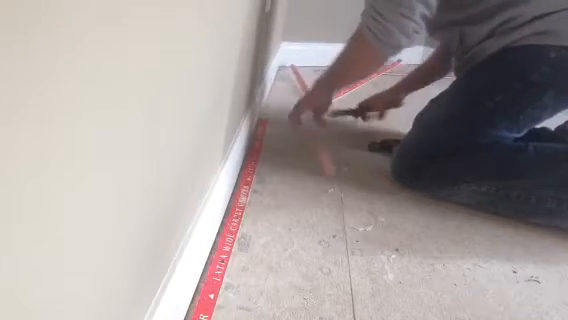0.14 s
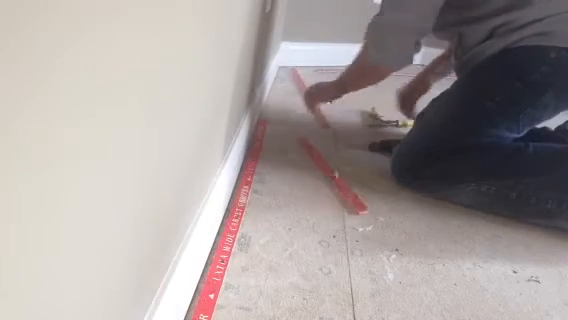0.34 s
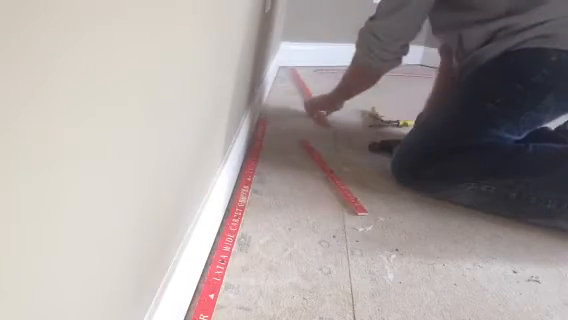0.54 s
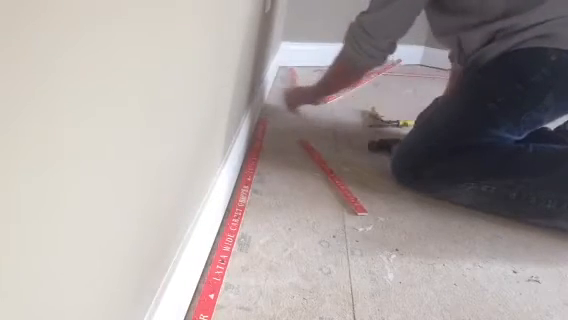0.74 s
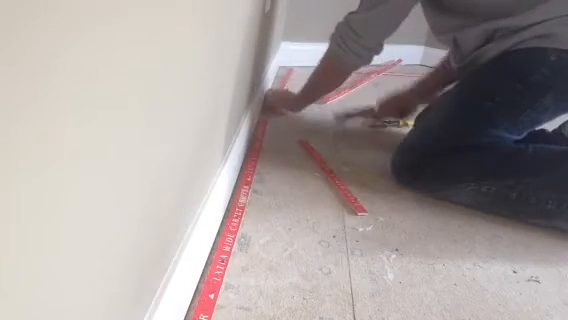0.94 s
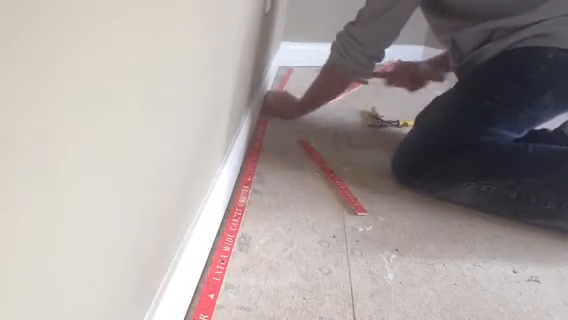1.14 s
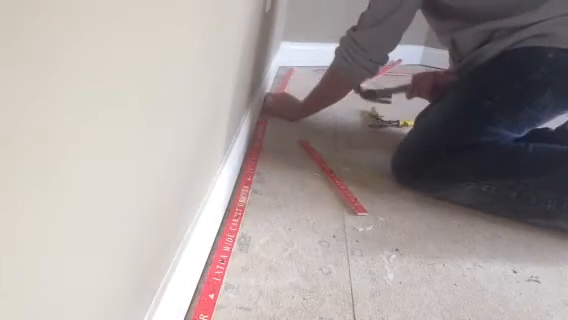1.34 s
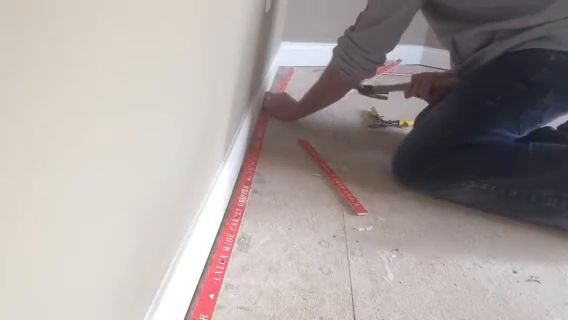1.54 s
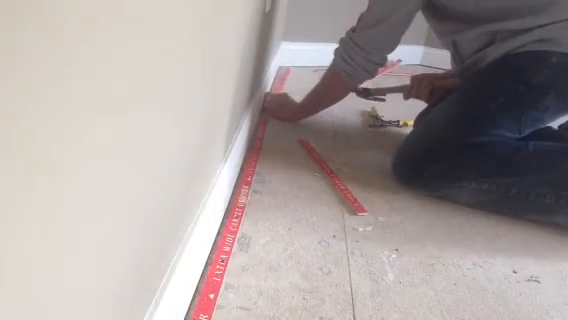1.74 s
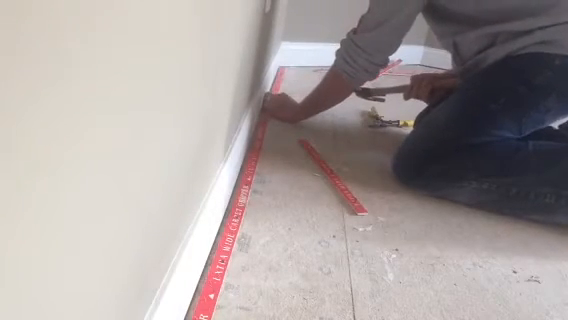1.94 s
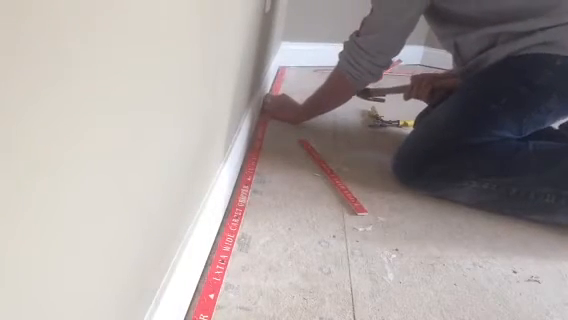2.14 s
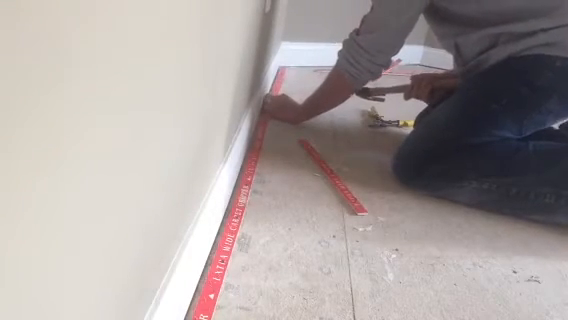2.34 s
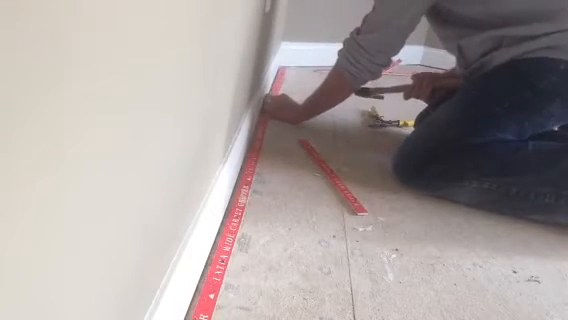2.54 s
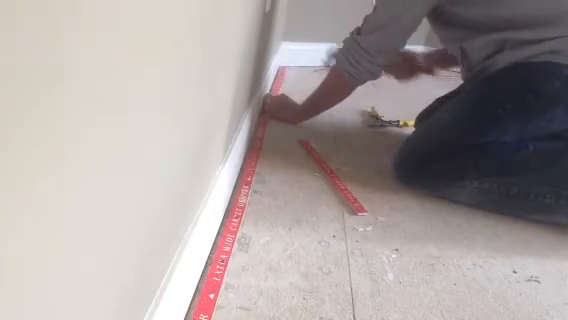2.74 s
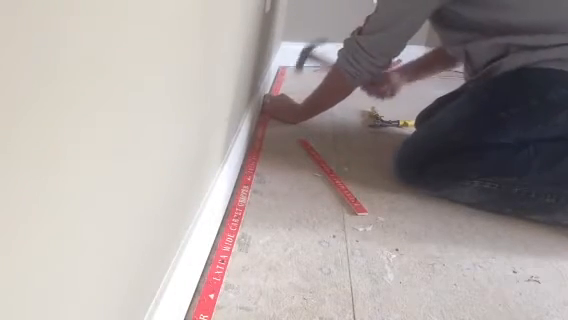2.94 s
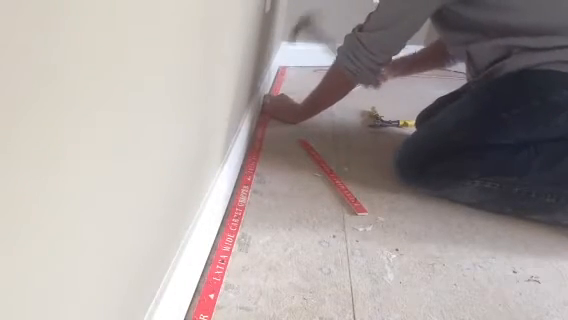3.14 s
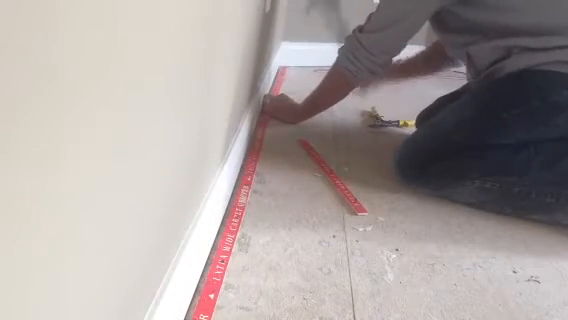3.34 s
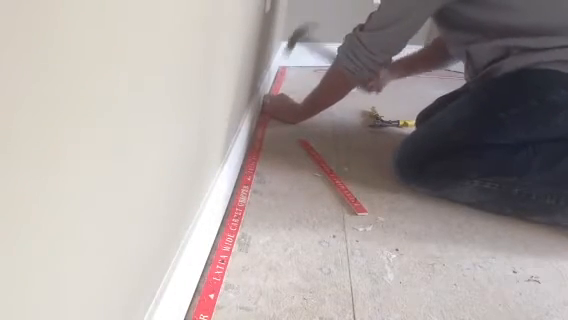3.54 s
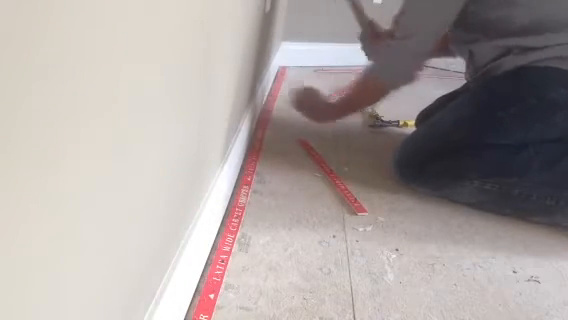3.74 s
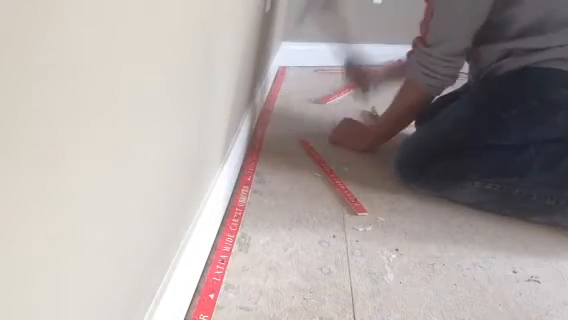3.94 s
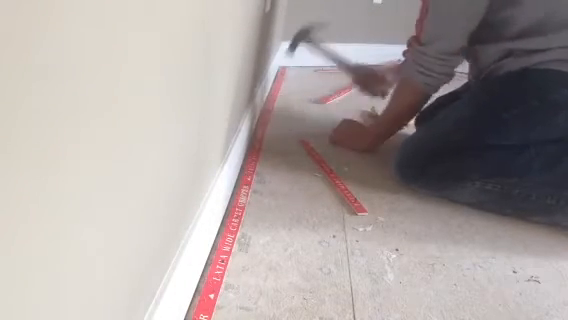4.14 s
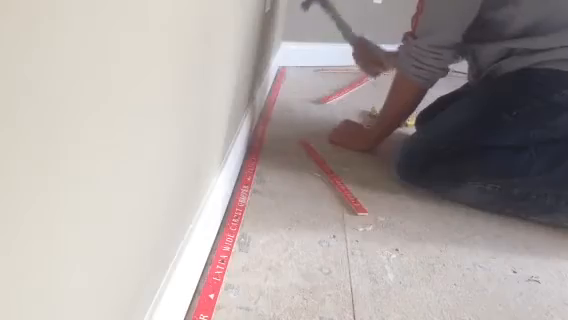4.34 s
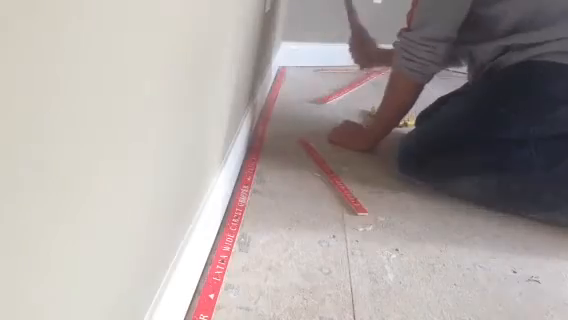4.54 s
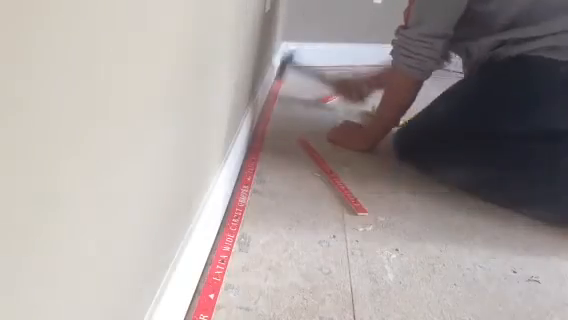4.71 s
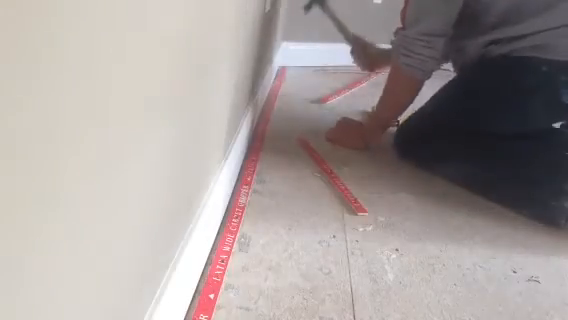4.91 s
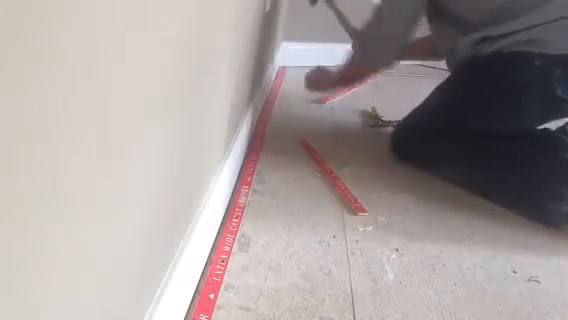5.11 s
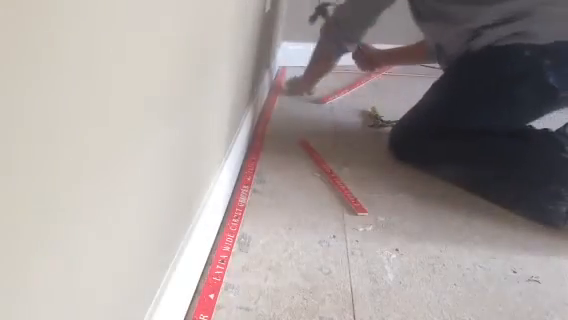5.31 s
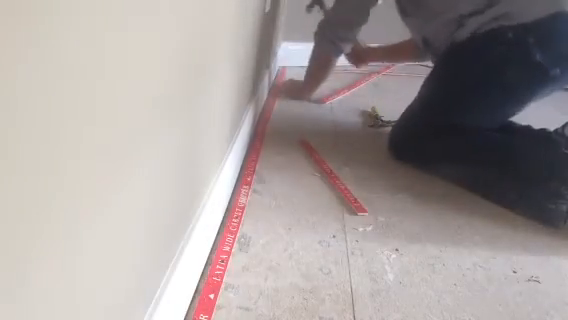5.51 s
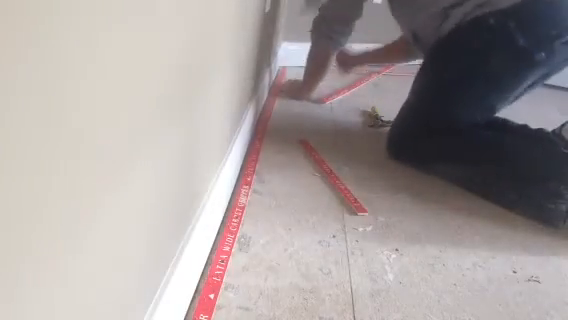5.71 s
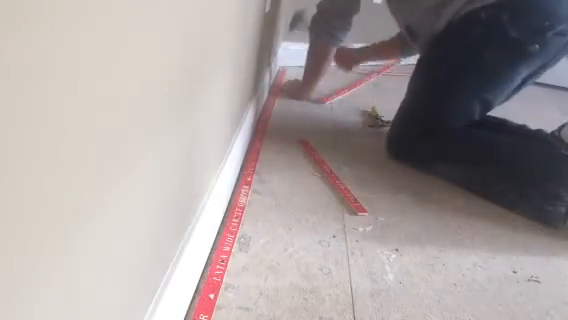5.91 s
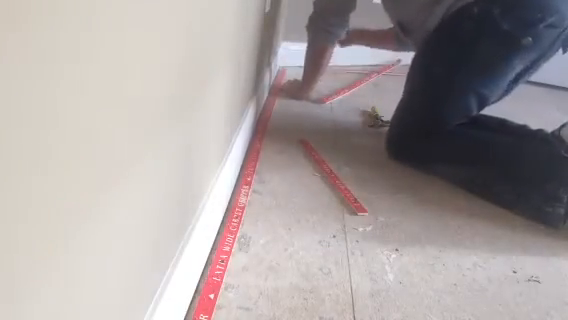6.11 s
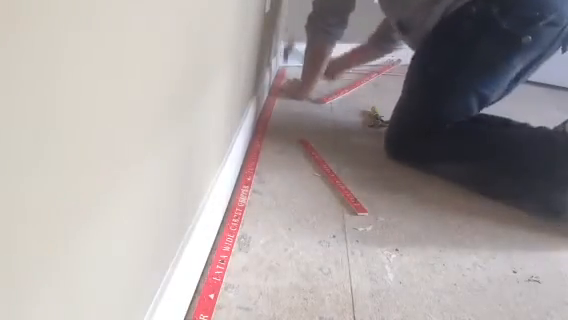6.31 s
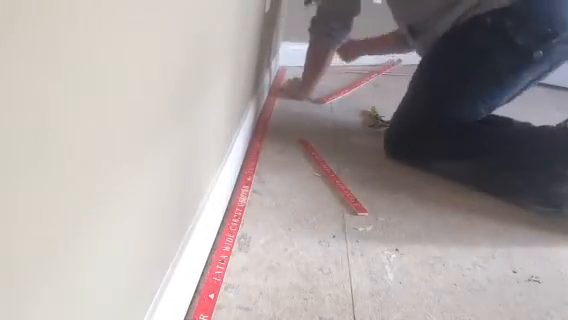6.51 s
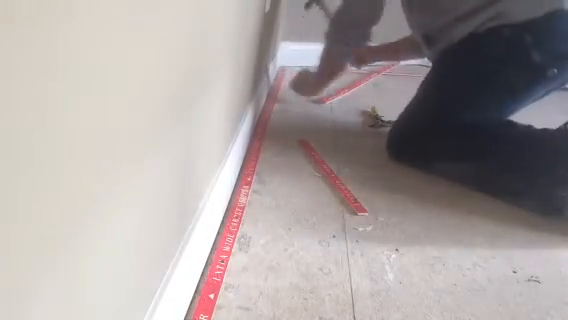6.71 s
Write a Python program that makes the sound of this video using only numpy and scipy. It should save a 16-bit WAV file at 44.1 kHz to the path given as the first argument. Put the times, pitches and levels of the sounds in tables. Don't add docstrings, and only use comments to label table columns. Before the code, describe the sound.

A loose wooden strip clatters onto a board floor in a bare echoing room, then soft thuds, shuffling, and five hard, spaced hammer blows.

```python
import sys
import numpy as np
from scipy import signal
from scipy.fft import rfft, irfft, next_fast_len
from scipy.io import wavfile
from scipy.ndimage import uniform_filter1d, minimum_filter1d

SR = 44100
rng = np.random.default_rng(int(sys.argv[2]) if len(sys.argv) > 2 else 0)


def master(y):
    cut = np.clip(np.atleast_2d(y).T, -1, 1)
    pcm = np.round(cut * 32767)
    wavfile.write(sys.argv[1], SR, pcm.astype(np.int16))


def volts(x):
    e = np.asarray(x, float) / 20
    return 10 ** e


N = 302526
LEAD = SR // 4


def at_hz(points, hz):
    points = np.array(points)
    return np.interp(np.log(np.maximum(hz, 1)), np.log(points[:, 0]), points[:, 1])


def rms_one(x):
    return x / np.sqrt(np.mean(x ** 2) + 1e-20)


def passed(x, hz, kind):
    return signal.sosfilt(signal.butter(2, hz, kind, fs=SR, output="sos"), x)


def coloured_noise(colour):
    size = next_fast_len(N)
    gain = volts(at_hz(colour, np.fft.rfftfreq(size, 1 / SR)))
    spectrum = rfft(rng.standard_normal(size)) * gain
    return rms_one(irfft(spectrum, size)[:N])


def causal_pulse(colour, size=8192):
    # f/Hz, level/dB
    top_lift = [(11000, 0.5), (12500, 0), (15000, 3.5)]
    hz = np.fft.rfftfreq(size, 1 / SR)
    cepstrum = irfft(np.log(volts(at_hz(colour, hz) + at_hz(top_lift, hz))), size)
    cepstrum[1:size // 2] *= 2
    cepstrum[size // 2 + 1:] = 0
    pulse = irfft(np.exp(rfft(cepstrum)), size)[:size // 2]
    return pulse / np.sqrt(np.sum(pulse ** 2))


def add(track, pulse, s):
    i = LEAD + round(s * SR)
    track[i:i + len(pulse)] += pulse[:len(track) - i]


def house_quiet():
    # f/Hz, level/dB per Hz
    quiet_colour = [(22, -37.5), (50, -1), (79, 2.5), (150, -8.5), (300, -15.5), (900, -31.5), (4000, -39),
                    (15500, -54.5)]
    return volts(-56) * coloured_noise(quiet_colour)


def singing():
    # start t/s, end t/s, f/Hz, level/dB
    partials = [(2.44, 2.714, 3690, -80), (3.148, 3.45, 2200, -83.5)]
    t = np.arange(N) / SR
    out = np.zeros(N)
    for start, end, hz, db in partials:
        swell = np.sin(np.pi * np.clip((t - start) / (end - start), 0, 1)) ** .5
        out += volts(db) * swell * np.sin(2 * np.pi * hz * t)
    return out


def rustle():
    # peak t/s, cloth level/dB, shuffle level/dB, fade/(dB per s)
    moves = [(.24, -41, -20.5, 38), (.89, -60, -31.5, 76), (.99, -56.5, -38.5, 29), (1.399, -61.5, -37, 41),
             (1.681, -65.5, -41, 37), (1.92, -61.5, -37, 55), (2.239, -65, -45, 76),
             (2.67, -78.5, -63.5, 37), (2.961, -67.5, -60.5, 59.5), (5.221, -65, -37, 36),
             (5.53, -65, -51, 35)]
    # f/Hz, level/dB per Hz
    cloth_colour = [(590, -31.5), (1000, -4), (1120, -6.5), (1410, -3), (2230, -5.5), (6480, -14),
                    (15500, -33)]
    # f/Hz, level/dB per Hz
    shuffle_colour = [(120, -23.5), (200, -2), (275, -8.5), (393, -6.5), (620, -10.5), (742, -16),
                      (2500, -34.5), (3600, -99)]
    peak_s, cloth_db, shuffle_db, fade = np.transpose(moves)[:, :, None]
    after = np.arange(N) / SR - peak_s
    rise_db = 103 * np.minimum(after, 0)
    fall_db = -fade * np.maximum(after, 0)
    cloth = volts((cloth_db + rise_db + fall_db).max(axis=0))
    shuffle = volts((shuffle_db + rise_db + 0.78 * fall_db).max(axis=0))
    return volts(1.5) * cloth * coloured_noise(cloth_colour) + volts(-5.5) * shuffle * coloured_noise(shuffle_colour)


def room_response():
    # f/Hz, t60/s
    room_t60 = [(110, 0.55), (250, 0.74), (500, 1.71), (1000, 1.635), (2000, 1.218), (4000, 1.1),
                (8000, 0.79), (14000, 0.31)]
    first_echo_s, build_up_s, echoes_per_s3 = 0.007, 0.019, 12000000
    boards_hz, boards_build_up_s = 1480, 0.016
    deep_hz, deep_build_up_s = 260, 0.017
    early_db, early_s = 6, 0.059
    t = np.arange(2 * SR) / SR

    share = np.clip(echoes_per_s3 * t ** 2 / SR, 1e-3, 1)
    echoes = rng.standard_normal(len(t)) * (rng.random(len(t)) < share) / np.sqrt(share)
    echoes *= 1 - np.exp(-np.clip(t - first_echo_s, 0, None) / build_up_s)
    boards = rng.standard_normal(len(t)) * (1 - np.exp(-t / boards_build_up_s))
    boards -= passed(boards * np.exp(-t / deep_build_up_s), deep_hz, "low")
    tail = passed(echoes, boards_hz, "high") + passed(boards, boards_hz, "low")
    tail *= volts(early_db * np.exp(-t / early_s))

    t60 = np.array(room_t60)[:, 1].mean()
    hz, s, cells = signal.stft(tail, SR, nperseg=2048, noverlap=1536)
    cells *= volts(-60 * s * (1 / at_hz(room_t60, hz)[:, None] - 1 / t60))
    tail = signal.istft(cells, SR, nperseg=2048, noverlap=1536)[1][:len(t)]
    return tail * volts(-60 * t / t60) * (t > 0) / np.sqrt(SR / 10)


def knocks(contacts):
    direct, to_room = np.zeros((2, N + LEAD))
    t = np.arange(16384) / SR
    grits = rng.standard_normal((len(contacts), len(t)))
    for (s, db, hz, octaves, contact_s, room_db), grit in zip(contacts, grits):
        edges = np.clip(hz * 2. ** (np.array([-.5, .5]) * max(octaves, .1)), 20, .45 * SR)
        push = grit * t * np.exp(-t / max(contact_s, 1e-4))
        knock = passed(passed(push, edges, "band"), edges[1], "low")
        knock *= volts(db) / np.abs(knock).max()
        add(direct, knock, s)
        click = passed(passed(1. * (t == 0), edges, "band"), edges[1], "low")
        add(to_room, volts(room_db) * np.std(knock) * rms_one(click), s + contact_s)
    return direct + signal.fftconvolve(to_room, room_response())[:N + LEAD]


def thuds():
    # t/s, peak level/dB, centre f/Hz, room level/dB
    soft_contacts = [(.10, -22.5, 185, -4), (.30, -20.5, 251.4, 13), (0.339, -17.5, 237.9, 10.5),
                     (0.598, -39, 67, -7), (0.801, -31.5, 130, -2), (1.03, -22, 260, -4),
                     (1.029, -40, 65.6, 2), (1.37, -32, 109, 2), (1.45, -35, 310, 6),
                     (1.599, -27.5, 129.6, 5.5), (1.79, -25.5, 119.3, 4.5), (2.01, -28.5, 123.5, 7.5),
                     (2.63, -54, 96, -11), (3.558, -28, 67.3, 6), (4.379, -36, 65, 0),
                     (5.048, -34.5, 65, -5), (5.51, -36, 507, -3.5), (5.758, -48, 143, 7)]
    contacts = [(s, db, hz, 1.305, .006 + 3.0 / hz, room_db) for s, db, hz, room_db in soft_contacts]
    contacts.append((.971, -12, 210, 0.86, 0.0052, 3))
    return knocks(contacts)


def clatter():
    # t/s, peak level/dB, centre f/Hz, contact t/s, room level/dB
    strip_taps = [(.115, -8.5, 900, 0.0015, -10), (.2, -24, 625, .02, 0.5),
                  (0.236, -27.5, 8800, 0.0009, -16), (.283, -18, 3600, 0.0011, 10),
                  (.307, -3, 1900, 0.0014, -.6), (.320, -30.5, 11100, 0.00043, -9),
                  (0.337, -4, 1300, 0.0012, 1.5), (.36, -16.5, 2000, 0.0033, -5.5),
                  (.391, -0.1, 1204, .0016, 3.5), (0.391, -19, 14160, 0.0012, 1),
                  (1.045, -22.5, 1020, 0.00089, -7), (1.077, -33.5, 1203, 0.00213, -1.5),
                  (1.586, -42.5, 600, 0.0044, 2), (1.709, -53.5, 690, 0.0031, 1),
                  (1.9, -52.5, 1350, 0.0079, -12), (5.331, -28, 570, .0035, -2)]
    width_octaves = 1.85
    contacts = [(s, db, hz, width_octaves + np.log2(hz / 1000), contact_s, room_db)
                for s, db, hz, contact_s, room_db in strip_taps]
    gap_growth = 1.25
    gaps = .009 * gap_growth ** np.arange(6)
    for k in range(6):
        contacts.append((.403 + gaps[:k].sum(), -7 - 2.3 * (k - 1.6) ** 2, 1597, width_octaves,
                         0.0029 * gap_growth ** k, -20.5))
    return knocks(contacts)


def blow_colour(brightness, wood_db, spot, nail):
    # f/Hz, level/dB per Hz
    shared_colour = [(29, -42), (50, -14), (140, -10.5), (450, -10.5), (900, -22), (1800, -25.5),
                     (6000, -36), (15500, -48)]
    nail_octaves, nail_ratio = 0.062, 1.436
    tilt_from_hz, tilt_to_hz = 2000, 8340
    hz = np.geomspace(29, 15500, 400)

    peaks = [(*spot[:2], 0.33), (*spot[2:], 0.17)]
    peaks.append((nail[0] * .845, -3.5, nail_octaves))
    for step, top_db in zip((0, -1, 1), nail[1:]):
        peaks.append((nail[0] * nail_ratio ** step, top_db, nail_octaves))

    tilt = at_hz([(tilt_from_hz, 0), (tilt_to_hz, 1), (hz[-1], .4)], hz)
    db = at_hz(shared_colour, hz) + brightness * np.log2(tilt_to_hz / tilt_from_hz) * tilt
    db += wood_db / (1 + (hz / 1100) ** 7.4)
    for centre, top_db, octaves in peaks:
        db += top_db * np.exp(-.5 * (np.log2(hz / centre) / octaves) ** 2)
    return np.transpose([hz, db])


def hammer():
    # t/s, strength level/dB, brightness/(dB per octave), wood level/dB, early floor-borne level/dB
    blows = [
        (-.09, 18.5, 8, -4.5, -38.5),
        (3.535, 27, 3.5, 2, -30),
        (4.128, 30.5, 0.9, 2, -22),
        (4.796, 30, -2, 6, -37),
        (5.899, 24, 2, -9, -29),
        (6.420, 28, -6, -4.5, -37),
    ]
    # board boom f/Hz, its level/dB, strip f/Hz, its level/dB
    spots = [(244, 11, 370, -5.5), (181.4, 10.5, 400, 2), (233, 10.5, 540, 4), (199, 7.5, 577, 3),
             (330, -0.5, 444, 4), (263, 8, 470, 10)]
    # f/Hz, level/dB, partial below level/dB, partial above level/dB
    nails = [(900, -6.5, 1.5, 1), (1021, 3, -1, 9), (828, 6, -0.5, 0), (1355, 4.5, 0, 5),
             (1035, 10, 9.5, 4.5), (1237, 3, -1.5, 4)]
    # f/Hz, level/dB over the blow's colour, t60/s
    steel_modes = [(1012, 1.5, 0.027), (1234, -11, 0.058), (1418, 3, 0.025), (1588, -2.5, 0.053),
                   (2070, -8.5, 0.18), (2480, -7.5, 0.045), (2640, 4.5, .03), (2860, -2, 0.036),
                   (3450, -16, 0.036), (4110, -15, 0.028), (5160, 2, 0.034), (8850, -10, .015)]
    # delay t/s, level/dB
    walls = [(.014, -13), (.019, -11), (.026, -12), (.038, -14), (.050, -16), (.062, -18)]
    lead_s = .014
    out = np.zeros(N + LEAD)
    t = np.arange(8192) / SR
    for (s, db, brightness, wood_db, early_db), spot, nail in zip(blows, spots, nails):
        steel = np.zeros(len(t))
        for (hz, mode_db, t60), chance in zip(steel_modes, rng.normal(0, 2.5, len(steel_modes))):
            steel += volts(mode_db - 19.5 - 26 + chance - 60 * t / t60) * np.sin(2 * np.pi * hz * t)
        steel[0] = 1
        colour = blow_colour(brightness, wood_db, spot, nail)
        pulse = volts(db) * signal.fftconvolve(causal_pulse(colour), steel)

        bright = pulse + volts(-8) * passed(pulse, 840, "high")
        splinter = rng.standard_normal(len(t)) * np.exp(-t / 0.0034) / 10
        crack = volts(-4.5 - 0.3 * brightness) * signal.fftconvolve(bright, splinter)
        crack = passed(crack, [250, 9000], "band")
        add(out, crack, s)

        wall_crack = passed(crack, 1900, "high")
        for (delay_s, wall_db), chance in zip(walls, rng.standard_normal((len(walls), 2))):
            add(out, volts(wall_db + 2 * chance[0]) * wall_crack, s + delay_s + 0.0016 * chance[1])

        add(out, volts(early_db - 11) * passed(crack, 1500, "high"), s - .023)
        early = rng.standard_normal(len(t)) * (t < lead_s) * np.exp(-t / 0.034) / 8
        dull = passed(passed(pulse, [400, 1900], "band"), 440, "high")
        add(out, volts(early_db) * signal.fftconvolve(dull, early), s - lead_s)
        add(out, signal.fftconvolve(pulse, room_response()), s)
    return out


def scene():
    hits = hammer() + clatter() + thuds()
    quiet = rustle() + singing() + house_quiet()
    return (hits[LEAD:] + quiet)[None]


def band_limit(x):
    return signal.sosfilt(signal.butter(12, 16310, fs=SR, output="sos"), x)


def record(dry):
    limit_db, release_db_per_s, attack_s = -3.2, 401.5, 0.0019
    heard = passed(dry, 40, "high")
    over_db = np.maximum(20 * np.log10(np.abs(heard[0]) + 1e-9) - limit_db, 0)
    ramp = release_db_per_s * np.arange(N) / SR
    held_db = np.maximum.accumulate(over_db + ramp) - ramp
    span = 2 * int(attack_s * SR) + 1
    cut_db = uniform_filter1d(-minimum_filter1d(-held_db, span), span)
    top_cut = signal.cheby2(10, 50, 16250, fs=SR, output="sos")
    limited = signal.sosfilt(top_cut, heard * volts(-cut_db))
    return band_limit(limited)


dry = scene()
out = record(dry)
master(out)
```